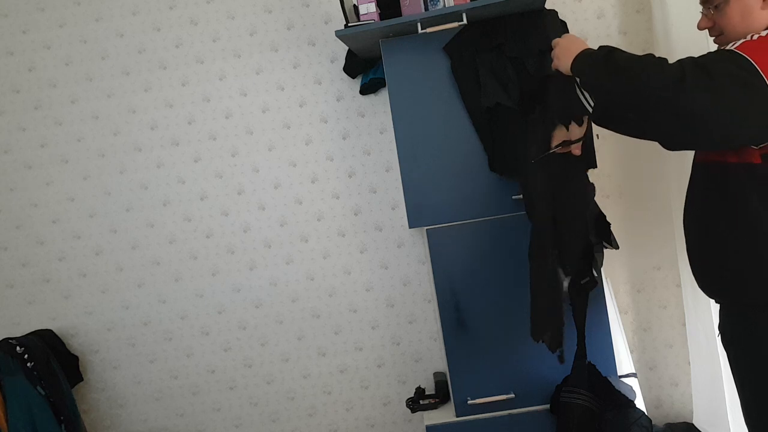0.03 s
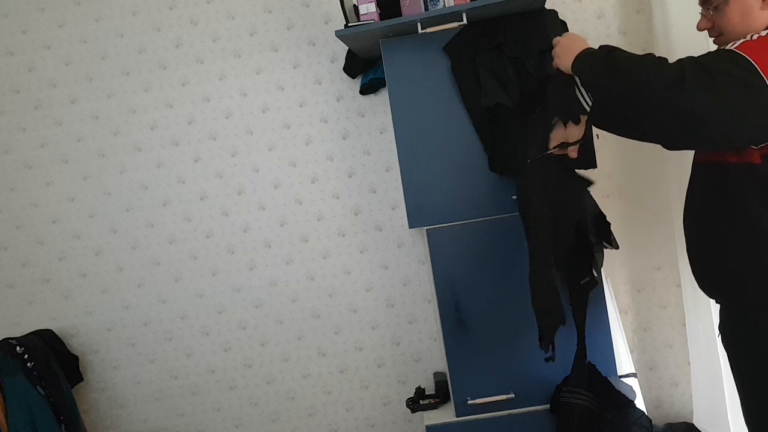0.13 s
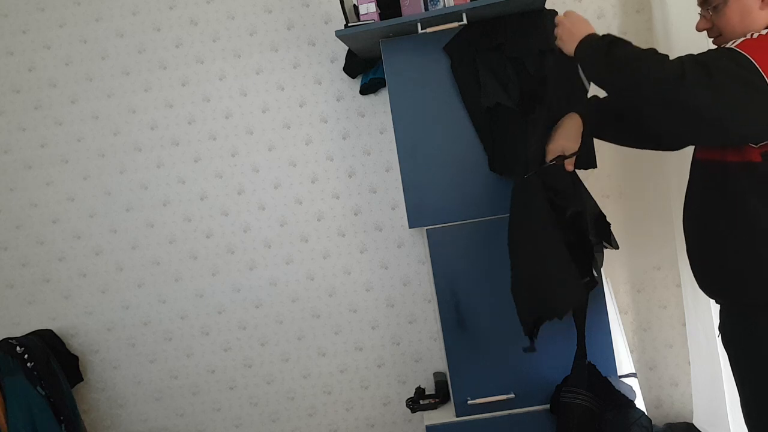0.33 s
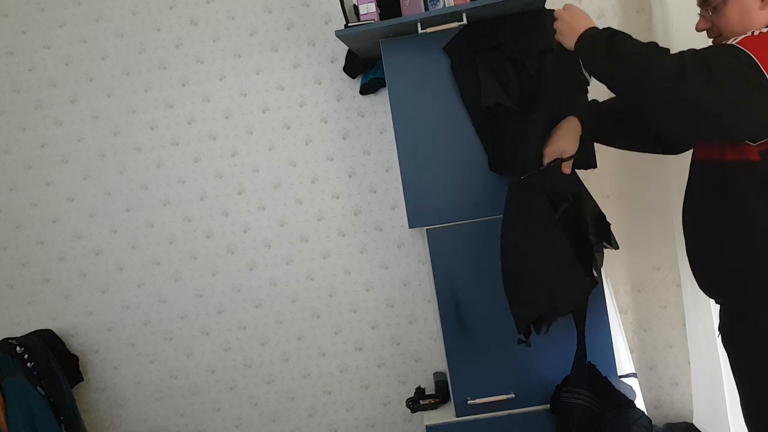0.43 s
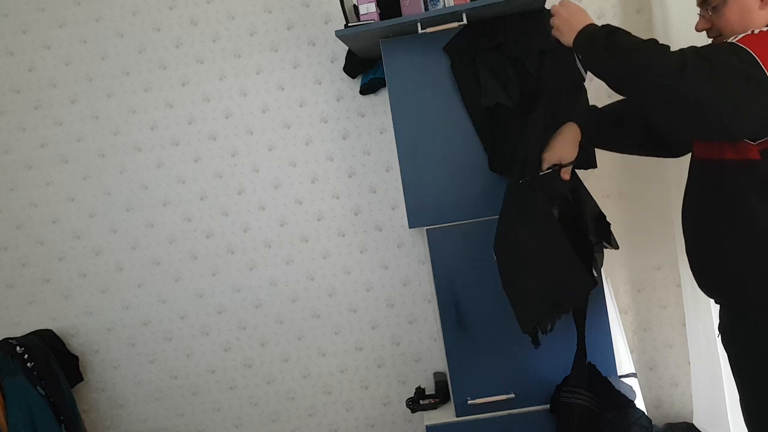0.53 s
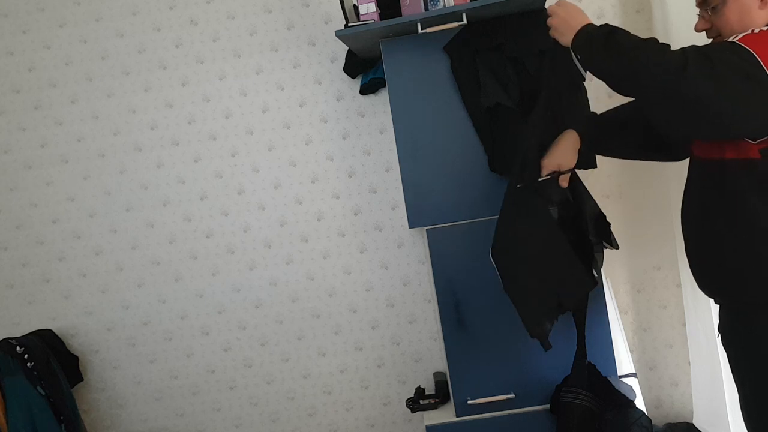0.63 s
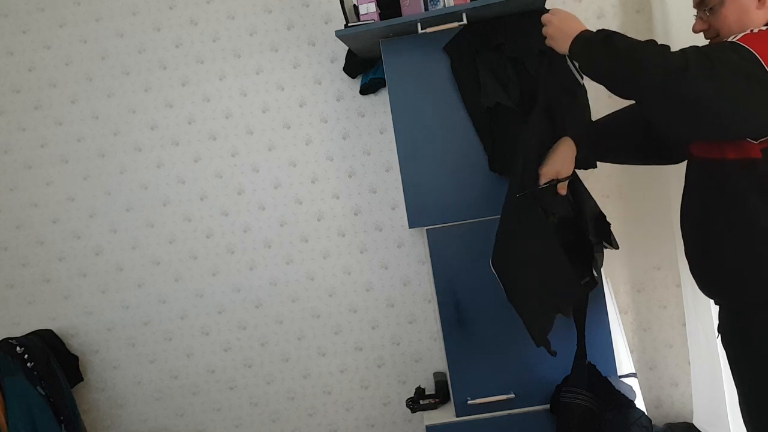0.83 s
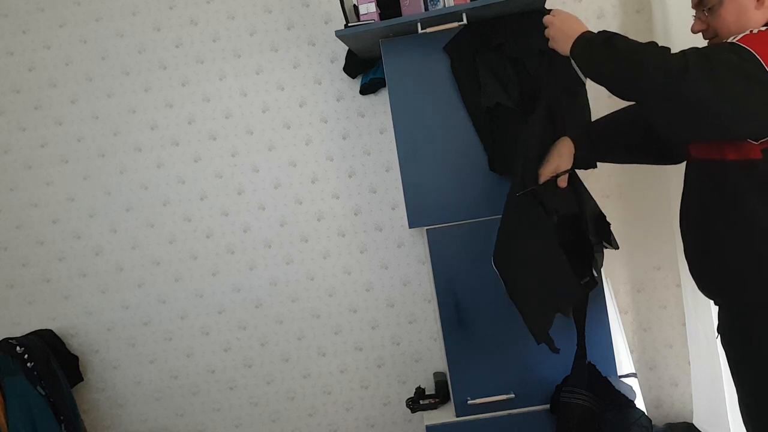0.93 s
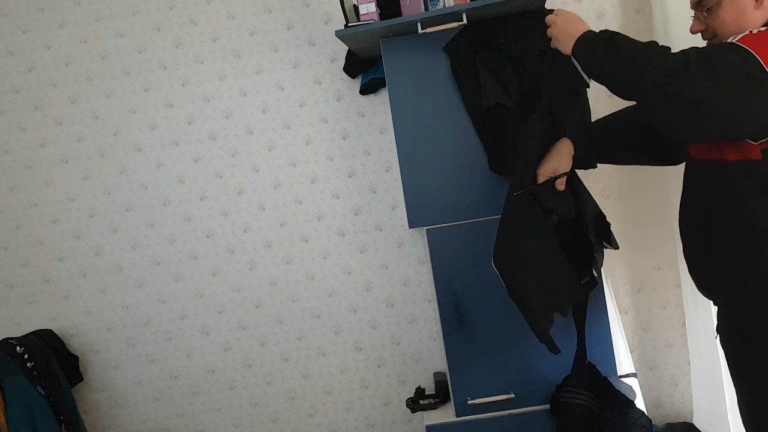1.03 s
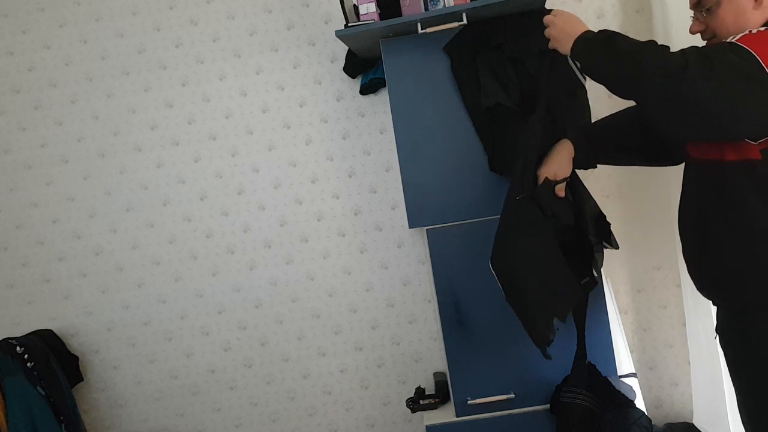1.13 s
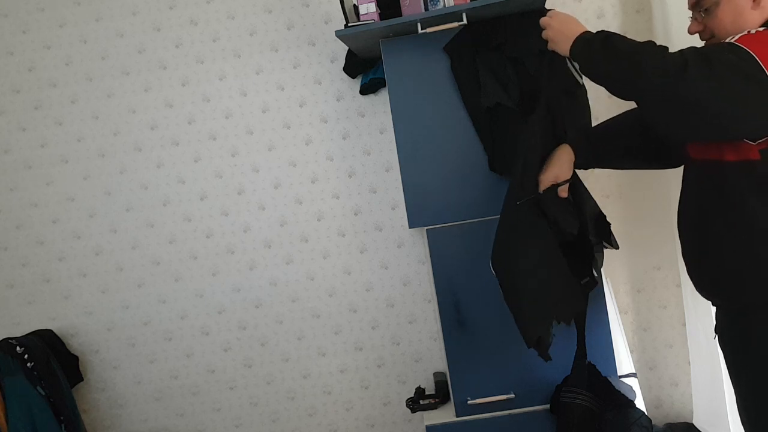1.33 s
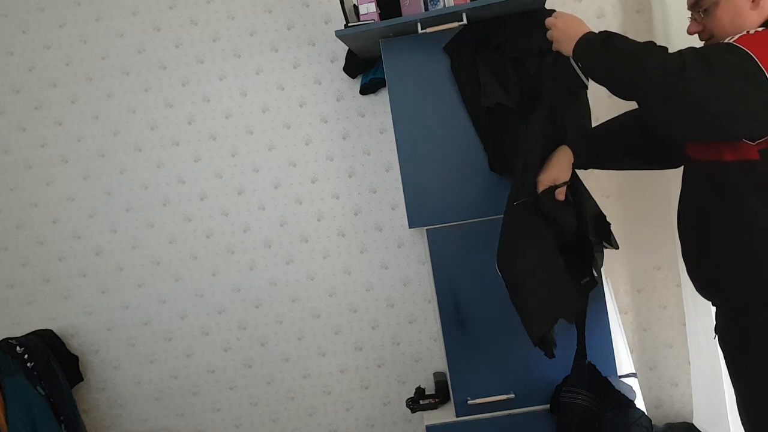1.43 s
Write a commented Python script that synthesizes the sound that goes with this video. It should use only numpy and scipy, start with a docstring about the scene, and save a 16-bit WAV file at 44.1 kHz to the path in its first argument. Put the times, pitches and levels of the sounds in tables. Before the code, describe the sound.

Cloth is ripped by hand in a small, quiet room. After a soft rustle, it jerks taut at 0.2 seconds and threads burst in a bright run, loudest around 0.3 to 0.4. A slower, duller tear with tiny squeaks continues until 0.7. Loose fabric then rustles softly until 1.5 seconds, with a small snap near 1.2, over a faint hum.

```python
"""Garment ripped by hand

In a small, quiet room the cloth jerks taut. Threads burst in one fast, bright run, then give way
in a slower, duller one; the stretched weave squeaks and rumbles. Loose cloth slides and flaps
between the pulls. The walls answer over a faint hum."""
import sys
import numpy as np
from scipy import signal
from scipy.fft import rfft, irfft
from scipy.io import wavfile

SR = 44100
rng = np.random.default_rng(int(sys.argv[2]) if len(sys.argv) > 2 else 0)


def dump(signal):
    """Clip the signal to [-1, 1] and save it as 16-bit WAV at the path in sys.argv[1]."""
    limited = np.clip(np.atleast_2d(signal).T, -1, 1)
    pcm = np.round(limited * 32767).astype(np.int16)
    wavfile.write(sys.argv[1], SR, pcm)


N = 66150
T, HZ = np.arange(N) / SR, np.fft.rfftfreq(2 * N, 1 / SR)

# Wall reverberation: f/Hz, T60/s
WALL_DECAY = [(60, 1), (300, 0.57), (1200, 0.41), (3000, 0.41), (7000, 0.46), (15000, 0.083)]
# Diffuse sound, left to right: f/Hz, coherence/1
COHERENCE = [(30, 0.64), (400, 0.62), (650, 0.71), (900, -0.11), (1700, 0.0065), (2600, .35), (3900, -0.11),
             (6000, 0.058), (16000, 0.55)]
# Room noise: f/Hz, gain/dB
AIR_SPECTRUM = [(20, -21), (30, -6), (42, -1.5), (75, -4.5), (135, -5), (200, -7), (330, -7), (430, -8.5),
                (560, -14), (1000, -12), (2500, -18.5), (5000, -26), (9000, -32), (13000, -22.5),
                (16000, -26)]
# Hum tones: f/Hz, level/dB
HUM_TONES = [(140, -79), (425.3, -77.5)]
# Rumble under the pull: t/s, level/dB
STRAIN_ENVELOPE = [(.18, -92), (.285, -67), (.345, -85), (.41, -66.5), (.57, -76.5), (.625, -60), (.7, -82)]
# Strained garment and its support: f/Hz, gain/dB
STRAIN_SPECTRUM = [(25, -18), (45, -30), (60, 3.5), (85, -17), (125, -5.5), (200, -33), (500, -72)]
# Rubbing strokes: peak t/s, rise/s, fade/s, level/dB, treble/dB
SLIDE_STROKES = [(.003, 0.061, 0.026, -56.5, -1), (.06, 0.043, 0.058, -64.5, 4.5),
                 (.205, 0.042, 0.014, -58, -1), (.753, 0.026, 0.03, -56.5, 3.5),
                 (0.924, 0.025, 0.051, -59.5, 0.5), (1.152, 0.058, .03, -59, 2.5),
                 (1.19, 0.016, 0.019, -54, 2.5), (1.36, 0.0097, 0.056, -61, 4.5),
                 (1.5, 0.016, .03, -66.5, 5)]
# Cloth on cloth: f/Hz, gain/dB
SLIDE_SPECTRUM = [(40, -42), (150, -5.5), (320, -1.5), (600, -8.5), (1150, -1.5), (1700, -3), (2600, -3.5),
                  (3800, -10), (6000, -14), (8500, -16), (12500, -12.5), (15700, -24)]
# Jerks and flaps: t/s, level/dB, centre f/Hz (lower for a larger fold)
TUG_EVENTS = [(0.203, -45.5, 350), (0.239, -42, 400), (0.285, -39, 300), (0.309, -47, 355),
              (0.48, -42.5, 446), (0.502, -42, 181), (0.591, -40, 490), (0.614, -50, 410),
              (0.647, -52, 413), (1.201, -54, 383), (1.357, -53, 322)]
# Weave squeaks: t/s, length/s, f/Hz, level/dB
CREAK_EVENTS = [(0.534, 0.036, 1190, -49.5), (0.59, 0.022, 1140, -49), (1.159, 0.0099, 1130, -53.5),
                (1.189, 0.015, 1080, -57)]
# Runs of snapping threads: t/s, level/dB, treble/dB
TEAR_ENVELOPE = [(.19, -73, 3), (.232, -54, 8), (.246, -42.5, -4.5), (0.275, -59, 9), (0.28, -43.5, -0.5),
                 (.314, -36, 0.5), (.355, -35, 0.5), (0.384, -38.5, -3), (.405, -48, -2), (.44, -48, -2),
                 (.49, -50, -2), (.53, -51, -3), (.57, -52.5, -2), (.582, -43.5, -5), (.61, -44.5, -4.5),
                 (.635, -47, -6), (.672, -64, 0.5), (0.688, -49, -5.5), (.725, -79, 11)]
# Strong threads breaking alone: t/s, level/dB
CRACK_EVENTS = [(.2045, -26), (0.2403, -45), (0.2772, -20), (0.2887, -17), (.3125, -13), (.3155, -17),
                (.330, -27), (0.3351, -20), (.381, -16), (0.405, -20), (.426, -28.5), (0.547, -27),
                (.592, -29), (.629, -24.5), (.649, -37), (1.189, -29), (1.201, -39)]
# Thread snap: f/Hz, gain/dB
THREAD_SPECTRUM = [(40, -30.5), (150, -25.5), (230, -20), (400, -16), (560, -10), (800, -5), (1080, -1),
                   (1450, -3.5), (1850, -2), (2500, -8), (3300, -11.5), (4600, -15.5), (5600, -16.5),
                   (7200, -19.5), (9600, -17), (11500, -14), (13500, -13.5), (15700, -22.5)]
# Right channel response: f/Hz, gain/dB
RIGHT_RESPONSE = [(30, 0.5), (150, -0.5), (500, 1.5), (1200, -0.5), (2500, -0.5), (4000, 0.5), (7200, -1),
                  (8400, -7.5), (9500, -14), (11000, -6.5), (14000, -7), (15700, 4)]


def amp(db):
    """Decibels to gain."""
    return 10 ** (np.asarray(db) / 20)


def unit_rms(x):
    """Scale to rms 1."""
    return x / np.sqrt(np.mean(x ** 2) + 1e-20)


def at_hz(points, hz):
    """Interpolate a table over log frequency."""
    f, value = np.transpose(points)
    return np.interp(np.log(hz + 1), np.log(f + 1), value)


def envelope(t_s, db):
    """Gain curve, silent outside its points."""
    return amp(np.interp(T, t_s, db)) * (T > t_s[0]) * (T < t_s[-1])


def filtered(x, response):
    """Apply a response sampled on HZ."""
    return irfft(rfft(x, 2 * N) * response)[:N]


def colour(x, spectrum):
    """Minimum-phase filter of unit energy."""
    log_gain = np.log(amp(at_hz(spectrum, abs(np.fft.fftfreq(8192, 1 / SR)))))
    taps = np.fft.ifft(np.exp(np.conj(signal.hilbert(log_gain)))).real[:4096]
    return signal.fftconvolve(x, taps / np.linalg.norm(taps))[:N]


def brighten(x, db, corner_hz=4080):
    """Treble shelf."""
    low = filtered(x, 1 / (1 + (HZ / corner_hz) ** 4))
    return low + amp(db) * (x - low)


def drift(hz):
    """Random wavering up to about hz."""
    return unit_rms(filtered(rng.standard_normal(2 * N), np.exp(-(HZ / hz) ** 2)))


def diffuse(a, b):
    """Two independent signals to partly coherent stereo."""
    coherence = np.clip(at_hz(COHERENCE, HZ), -1, 1)
    return np.array([a, filtered(a, coherence) + filtered(b, np.sqrt(1 - coherence ** 2))])


def crackle(rate_per_s, spread_db, hiss, jerk_hz=91, jerk_db=1.5):
    """Uneven clicks over the hiss of fine fibres, coming in jerks."""
    sizes = amp(spread_db * np.minimum(rng.exponential(1, N), 3))
    clicks = sizes * rng.choice([-1, 1], N) * (rng.random(N) < rate_per_s / SR)
    jerks = unit_rms(filtered(rng.standard_normal(2 * N), HZ * np.exp(-HZ / jerk_hz)))
    grain = unit_rms(clicks) + hiss * rng.standard_normal(N)
    return unit_rms(grain * amp(jerk_db * jerks))


def air(noise_db=-67.5):
    """Steady room noise and faint hum."""
    hum = sum(amp(db) * np.sin(2 * np.pi * (hz * T + rng.random())) for hz, db in HUM_TONES)
    noise = [colour(white, AIR_SPECTRUM) for white in rng.standard_normal((2, N))]
    return amp(noise_db) * diffuse(*noise) + hum


def wall_echoes(rate_per_s=5000, first_s=0.0015, early_db=2.5, early_s=0.0083):
    """Wall response to one spot: strong early echoes, short diffuse tail."""
    echoes = rng.standard_normal((2, N)) * (rng.random((2, N)) < rate_per_s / SR)
    hz, t_s, bands = signal.stft(echoes, SR, nperseg=256)
    decay = amp(-60 * t_s / at_hz(WALL_DECAY, hz)[:, None])
    tails = signal.istft(bands * decay, SR, nperseg=256)[1][:, :N]
    tails = tails * (T > first_s) * (1 + amp(early_db) * np.exp(-T / early_s))
    return diffuse(*tails / np.linalg.norm(tails, axis=1, keepdims=True))


def room(x, spots=8, wander_hz=44.4, wet_db=3, left_lag_s=0.00005):
    """Direct sound from slightly right; echoes shift as the sounding spot wanders over the cloth."""
    weights = np.array([drift(wander_hz) ** 2 for _ in range(spots)])
    weights /= np.linalg.norm(weights, axis=0)
    wet = sum(signal.fftconvolve((x * w)[None], wall_echoes(), axes=1)[:, :N] for w in weights)
    left = filtered(x, np.exp(-2j * np.pi * HZ * left_lag_s))
    return (np.array([left, x]) + amp(wet_db) * wet) / np.hypot(1, amp(wet_db))


def strain():
    """Garment and support rumble while the pull lasts."""
    return colour(rng.standard_normal(N), STRAIN_SPECTRUM) * envelope(*np.transpose(STRAIN_ENVELOPE))


def slides(roundness=1.64):
    """The weave catches and slips as folds rub; each stroke swells and fades."""
    catches = crackle(rate_per_s=3000, spread_db=6.5, hiss=0.43)
    out = np.zeros(N)
    for peak_s, rise_s, fade_s, db, treble_db in SLIDE_STROKES:
        from_peak = np.maximum((peak_s - T) / rise_s, (T - peak_s) / fade_s)
        out += brighten(catches, treble_db) * amp(db) * np.exp(-from_peak ** roundness)
    return colour(out, SLIDE_SPECTRUM)


def tugs(rise_s=0.0011, fade_s=0.0066, below_db_per_oct=11, above_db_per_oct=7.5):
    """Soft, low puffs as the cloth jerks taut or flaps."""
    octaves = np.arange(-4, 7)
    hump_db = np.minimum(octaves * below_db_per_oct, -octaves * above_db_per_oct)
    out = np.zeros(N)
    for start_s, db, centre_hz in TUG_EVENTS:
        age_s = np.maximum(T - start_s, 0)
        swell = amp(db) * (1 - np.exp(-age_s / rise_s)) * np.exp(-age_s / fade_s)
        spectrum = np.column_stack([centre_hz * 2. ** octaves, hump_db])
        out += colour(swell * rng.standard_normal(N), spectrum)
    return out


def creaks(waver_depth=0.0601, waver_hz=300):
    """Stretched threads stick and slip briefly at a rough pitch."""
    out = np.zeros(N)
    for start_s, length_s, hz, db in CREAK_EVENTS:
        progress = np.clip((T - start_s) / length_s, 0, 1)
        swell = np.sqrt(abs(np.sin(np.pi * progress)))
        pitch_hz = hz * (1 + waver_depth * drift(waver_hz))
        out += amp(db) * swell * unit_rms(np.sin(2 * np.pi * np.cumsum(pitch_hz) / SR))
    return out


def tear():
    """Threads snap in quick succession; strong ones crack singly."""
    t_s, db, treble_db = np.transpose(TEAR_ENVELOPE)
    snaps = crackle(rate_per_s=2600, spread_db=3.5, hiss=0.54) * envelope(t_s, db)
    snaps = brighten(snaps, np.interp(T, t_s, treble_db))
    cracks = sum(amp(crack_db) * (np.arange(N) == round(at_s * SR)) for at_s, crack_db in CRACK_EVENTS)
    return colour(snaps + brighten(cracks, db=-2), THREAD_SPECTRUM)


def scene():
    """Cloth in the room, over rumble and air."""
    return room(tear() + creaks() + slides() + tugs()) + strain() + air()


def record(dry, cutoff_hz=15750):
    """Treble dip on the right, then a low-pass on both channels."""
    right = filtered(dry[1], amp(at_hz(RIGHT_RESPONSE, HZ)))
    lowpass = signal.firwin(511, cutoff_hz, window=("kaiser", 9), fs=SR)
    return signal.oaconvolve(np.array([dry[0], right]), lowpass[None], "same")


dry = scene()
out = record(dry)
dump(out)
```